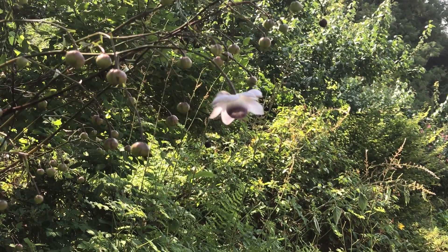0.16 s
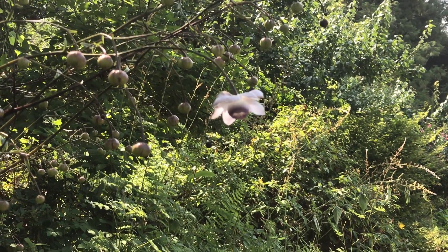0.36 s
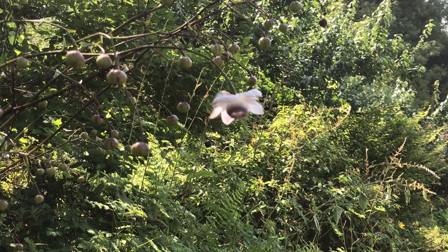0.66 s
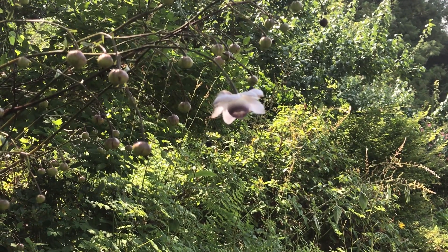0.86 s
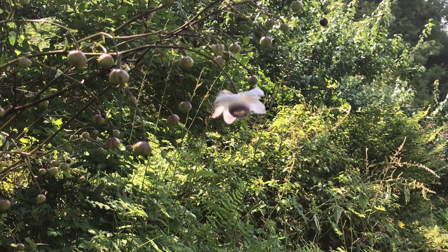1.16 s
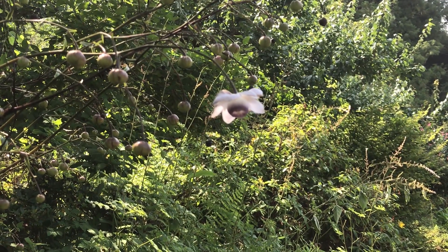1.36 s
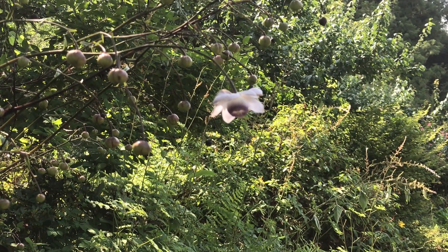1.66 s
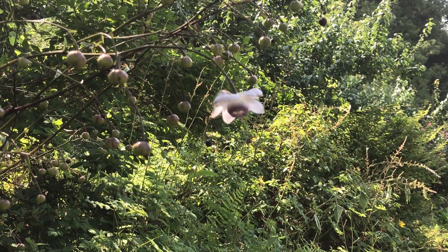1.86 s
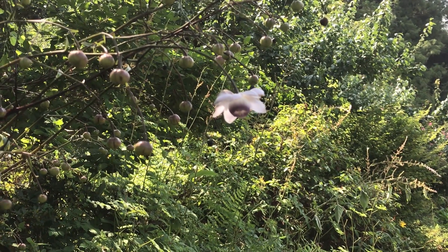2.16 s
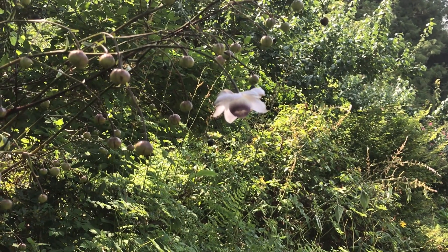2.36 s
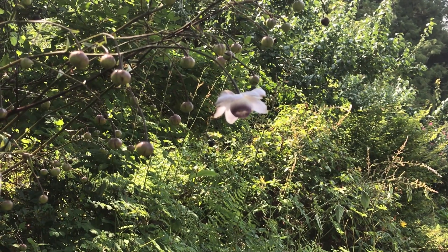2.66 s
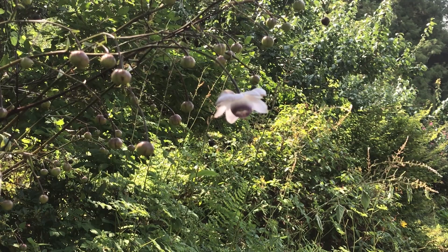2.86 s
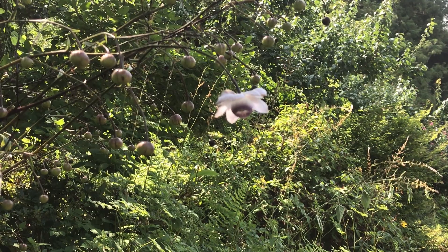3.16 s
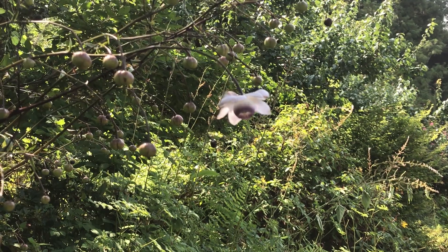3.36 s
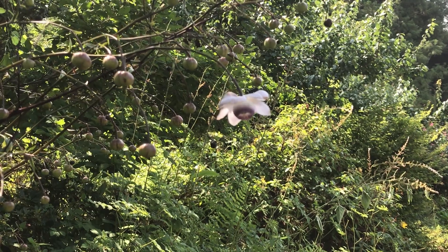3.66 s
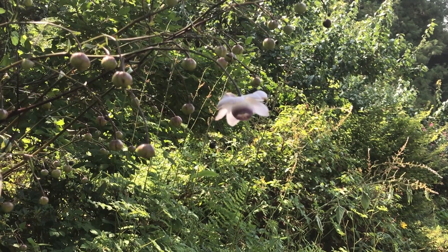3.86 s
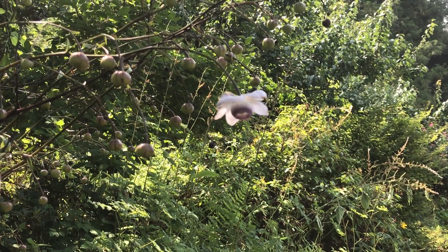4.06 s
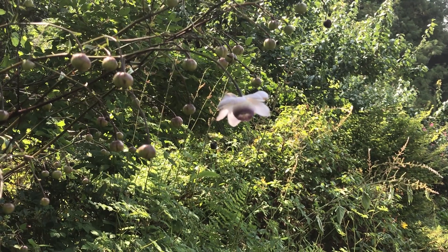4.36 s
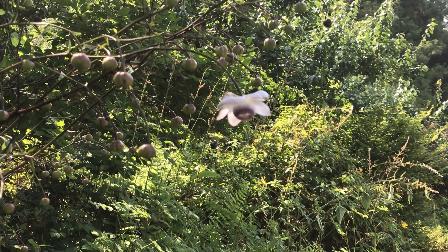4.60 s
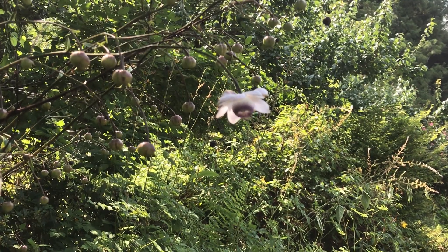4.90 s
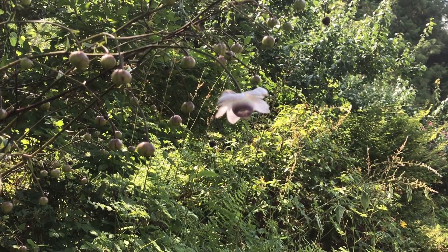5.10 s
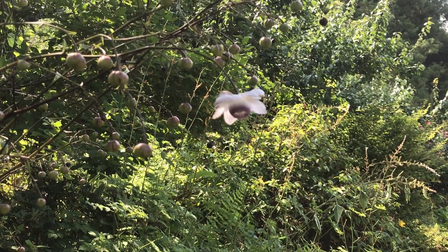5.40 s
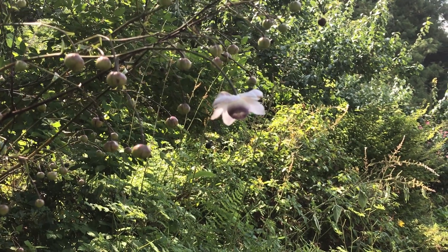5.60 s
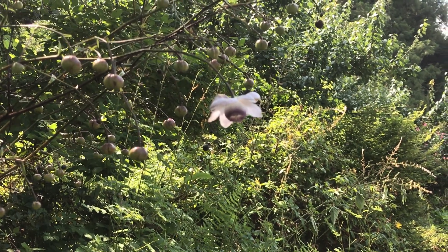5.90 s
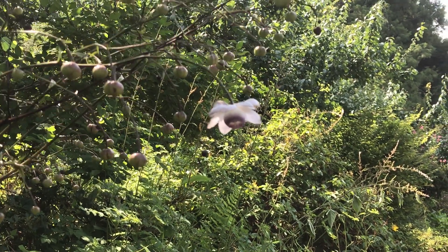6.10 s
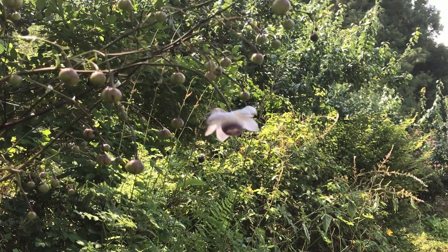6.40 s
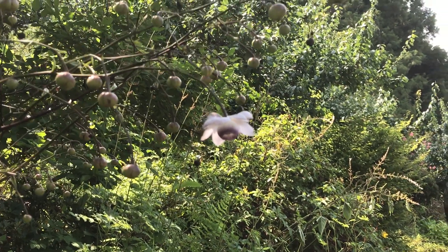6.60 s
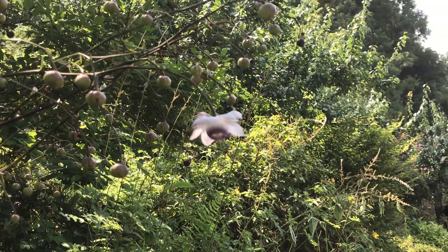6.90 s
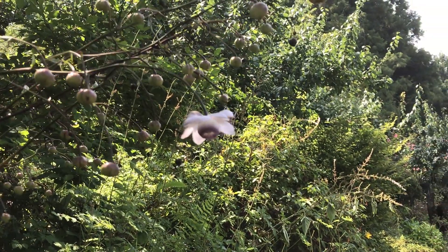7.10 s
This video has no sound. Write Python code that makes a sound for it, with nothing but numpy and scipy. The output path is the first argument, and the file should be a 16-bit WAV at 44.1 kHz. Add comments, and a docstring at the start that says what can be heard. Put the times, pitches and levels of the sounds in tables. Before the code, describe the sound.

In a leafy garden, a continuous high cicada chorus hisses throughout. Two insects rasp in short, uneven bursts above it, while another ticks rapidly and fades. A smooth insect whine swells early, then stops abruptly near five seconds as a brighter buzzing singer takes over. Beneath are faint bird chips, a repeated rising slide, low hoots and distant engine hum. Open outdoor microphone, insects dominant, birds far off with slight leafy echo.

```python
"""Cicada garden in the heat

A far chorus hisses steadily as the sum of many click trains and noise; nearer singers add gliding
rows of harmonics, a line spectrum or a narrow rough band. Two insects rasp as swells of resonant noise.
A bird repeats a rising slide with its octave; chips, far whistles and low hoots are gliding sines,
and an insect ticks as short swells of one tone. Traffic hums below in engine harmonics and a
resonant drone, over a bed of coloured noise for wind, leaves and a far town."""
import sys
import numpy as np
from scipy import signal
from scipy.fft import rfft, irfft, next_fast_len
from scipy.io import wavfile

SR = 44100
rng = np.random.default_rng(int(sys.argv[2]) if len(sys.argv) > 2 else 0)


def int16_out(signal):
    """Quantize to a 16-bit WAV file."""
    q = np.round(np.clip(np.atleast_2d(signal).T, -1, 1) * 32767)
    wavfile.write(sys.argv[1], SR, q.astype(np.int16))


def gain_from_decibels(decibels):
    """Convert decibel values to linear amplitude factors."""
    exponent = np.asarray(decibels, float) / 20
    return 10 ** exponent


N = 319725


def rms_one(x):
    """Normalisation: scale a signal to unit rms."""
    return x / np.sqrt(np.mean(x ** 2) + 1e-20)


def in_time(rows, s):
    """Linear interpolation: the columns of a table read at the times s."""
    at, *columns = np.transpose(rows)
    return [np.interp(s, at, c) for c in columns]


def ramp(t, start_s, length_s):
    """Linear onset: 0 before the start, 1 after the given length."""
    return np.clip((t - start_s) / length_s, 0, 1)


def coloured(x, points):
    """Spectral filtering: weight x by a (frequency [Hz], gain [dB]) curve, drawn over log frequency."""
    hz, db = np.transpose(points)
    size = next_fast_len(N + 4096)
    log_hz = np.log(np.arange(size // 2 + 1) * SR / size + 1)
    gain = gain_from_decibels(np.interp(log_hz, np.log(hz), db, -120, -120))
    return irfft(rfft(x, size) * gain, size)[:N]


def drift(rate):
    """Low-pass noise: a slow random curve of spread 1, with a double pole at rate [Hz]."""
    r = np.exp(-40 * np.pi * rate / SR)  # drawn at a twentieth of the sample rate
    white = rng.standard_normal(N // 20 + 4002)
    slow = signal.lfilter([1], [1, -2 * r, r * r], white)[4000:]
    return np.interp(np.arange(N) / 20, np.arange(len(slow)), rms_one(slow - slow.mean()))


def resonance(x, hz, width_hz):
    """Damped resonator: a two-pole band with a peak gain of about 1."""
    r = np.exp(-np.pi * width_hz / SR)
    poles = [1, -2 * r * np.cos(2 * np.pi * hz / SR), r * r]
    return signal.lfilter([(1 - r * r) / 2, 0, (r * r - 1) / 2], poles, x)


def sine(hz):
    """Phase integration: a sine of rms 1 that follows a pitch curve."""
    return np.sqrt(2) * np.sin(2 * np.pi * (np.cumsum(hz) / SR + rng.random()))


def note(length_s, start_hz, end_hz, edge):
    """Linear frequency glide: a sine with tapered ends, edge being the tapered share."""
    size = round(length_s * SR)
    return signal.windows.tukey(size, np.clip(edge, 0, 1)) * sine(np.linspace(start_hz, end_hz, size))


def clicks(hz, uneven):
    """Pulse train: one click per cycle of hz, uneven in size."""
    cycles = np.cumsum(hz) / SR + rng.random()
    marks = np.diff(np.floor(cycles), prepend=0) > 0
    return marks * (1 + uneven * rng.standard_normal(N))


def add(out, s, sound):
    """Superposition: mix a short sound in at time s."""
    at = max(round(s * SR), 0)
    out[at:at + len(sound)] += sound[:N - at]


def bumps(events, length_s):
    """Amplitude envelope: a smooth swell centred on each event."""
    out, shape = np.zeros(N), np.hanning(round(length_s * SR))
    for s, db in events:
        add(out, s - length_s / 2, gain_from_decibels(db) * shape)
    return out


def garden(x, wet_db, t60):
    """Diffuse scattering off leaves and trunks: echoes as a tail of noise that dies 60 dB in t60 [s]."""
    s = np.arange(round(t60 * SR)) / SR
    onset = np.minimum(s / 0.0093, 1)
    tail = rng.standard_normal(len(s)) * gain_from_decibels(-60 * s / t60) * onset
    return x + gain_from_decibels(wet_db) * signal.fftconvolve(x, tail / np.linalg.norm(tail))[:N]


# Course of the far chorus: (time [s], rms level [dB])
CHORUS_LEVEL = [(0.0, -38), (4.3, -39), (5.6, -39.5), (6.6, -38), (7.25, -38)]
# Spectral shape of the chorus: (frequency [Hz], relative level [dB])
CHORUS_SPECTRUM = [(2350, -47.5), (4000, -32.5), (4540, -26.5), (5450, -22.5), (5680, -16), (5860, -12),
                   (7280, -3.5), (7880, -1), (8780, 2), (9730, -7.5), (10700, -42.5), (13500, -31),
                   (15700, -37.5), (17000, -35)]


def chorus(t, count=14):
    """Incoherent summation: click trains at separate wavering rates, blurred by the leaves into hiss."""
    singers = np.zeros(N)
    for hz in rng.uniform(260, 520, count):
        train = clicks(hz * (1 + 0.004 * drift(3)), uneven=0.54)
        singers += rng.choice([-1, 1]) * gain_from_decibels(0.55 * drift(1.7)) * train
    blur = rng.standard_normal(N) * gain_from_decibels(0.42 * drift(12.0))
    hiss = coloured(0.47 * rms_one(singers) + blur, CHORUS_SPECTRUM)
    return gain_from_decibels(in_time(CHORUS_LEVEL, t)[0]) * rms_one(hiss)


# Two far engines changing speed, one list each:
# (time [s], mean firing rate [Hz], mean level of the fundamental [dB])
ENGINE_COURSES = [
    [(0, 56.65, -64.5), (.4, 56.85, -64), (.8, 41.67, -66), (1.1, 52.7, -72.5), (5.6, 51.93, -74),
     (6.1, 53.95, -62.5), (7.0, 67, -60.5), (7.25, 72, -66)],
    [(5.1, 65.6, -87), (5.3, 74.63, -68), (6.2, 115.8, -69), (6.4, 120, -102)],
]
# Course of the drone's main band: (time [s], mean level [dB])
DRONE_LEVEL = [(0.0, -64), (2.1, -81), (3.2, -69.5), (4.4, -73.5), (5.4, -67), (7.25, -79.5)]
DRONE_HZ = 109.6


def traffic(t):
    """Harmonic series and resonance: engine notes with two weak overtones, a narrow drone with its octave."""
    engines = np.zeros(N)
    for course in ENGINE_COURSES:
        hz, level_db = in_time(course, t)
        hz = hz + 1.446 * drift(3.7)
        harmonics = sine(hz) + gain_from_decibels(-12) * sine(2 * hz) + gain_from_decibels(-19) * sine(3 * hz)
        engines += gain_from_decibels(level_db + 1.4 * drift(10.0)) * harmonics
    hum = rng.standard_normal(N)
    drone = rms_one(resonance(resonance(hum, DRONE_HZ, 15), DRONE_HZ, 15))
    octave = rms_one(resonance(resonance(hum, 2 * DRONE_HZ, 22), 2 * DRONE_HZ, 22))
    drone_db = in_time(DRONE_LEVEL, t)[0] + 0.5 * drift(1.04)
    return engines + gain_from_decibels(drone_db) * (drone + gain_from_decibels(-11.5) * octave)


# Spectral shape of wind, leaves and far town: (frequency [Hz], relative level [dB])
AIR_SPECTRUM = [(19, -47), (32, -3.5), (59, -0.5), (111, -5), (174, -8), (513, -17.5), (643, -17.5),
                (788, -19), (1710, -21), (2370, -19.5), (3360, -24.5), (3790, -29), (4200, -39),
                (5460, -54), (9240, -120)]
AIR_DB = -66  # rms


def air():
    """Broadband noise: white noise shaped to the steady sound of wind, leaves and a far town."""
    return gain_from_decibels(AIR_DB) * rms_one(coloured(rng.standard_normal(N), AIR_SPECTRUM))


# Swells of the two rasping insects: (centre time [s], level of the main band at the peak [dB])
LOW_RASP_SWELLS = [(0.016, -43), (0.51, -46), (1.005, -44.5), (1.458, -52), (1.826, -55), (2.182, -52),
                   (2.86, -46.5), (3.186, -45), (3.846, -40.5), (4.423, -42.5), (4.687, -42.5),
                   (5.01, -42.5), (5.294, -43.5), (5.663, -41.5), (5.947, -44), (6.224, -42.5),
                   (6.553, -42), (6.834, -41.5), (7.065, -41.5)]
HIGH_RASP_SWELLS = [(0.488, -41), (0.873, -45), (0.983, -42.5), (1.307, -45), (1.512, -38), (1.738, -44),
                    (2.574, -38), (3.402, -36.5), (3.862, -40.5), (4.203, -44), (4.556, -36),
                    (4.896, -42.5), (5.067, -39), (5.25, -43.5), (5.611, -35), (6.051, -43.5), (6.217, -45),
                    (6.323, -36), (6.866, -37), (7.244, -41.5)]


def rasp(events, hz, width_hz, length_s):
    """Resonant excitation: grainy scraping in one band, in short swells, with a faint broad treble edge."""
    grains = rng.standard_normal(N) * gain_from_decibels(0.53 * drift(240))
    body = rms_one(resonance(resonance(grains, hz, width_hz), hz, width_hz))
    edge = rms_one(resonance(grains, 1.22 * hz, 1400))
    return bumps(events, length_s) * (body + gain_from_decibels(-13) * edge)


# Pitch and level start here at time zero, then sink; the gap is the first one.
TICK_FIRST_S, TICK_GAP_S, TICK_SLOWING_S = 0.039, 0.058, 0.0006  # slowing: growth per gap
TICK_DB, TICK_FADE_DB_PER_S = -62.5, 2.2
TICK_HZ, TICK_SAG_HZ_PER_S, TICK_LENGTH_S = 4586, 90.0, 0.029


def ticks(t, count=34):
    """Amplitude gating: swells of one sinking, rough tone; the gaps lengthen and the level fades."""
    k, chance = np.arange(count), rng.standard_normal((count, 2))
    s = TICK_FIRST_S + TICK_GAP_S * k + TICK_SLOWING_S * k * k / 2 + 0.003 * chance[:, 0]
    db = TICK_DB - TICK_FADE_DB_PER_S * s + 1.1 * chance[:, 1]
    tone = sine(TICK_HZ - TICK_SAG_HZ_PER_S * t + 170 * drift(196))
    return bumps(zip(s, db), TICK_LENGTH_S) * (1 + 0.46 * drift(400)) * tone


# Series of evenly spaced chips: (first time [s], last time [s], mean direct level [dB])
CHIP_ROWS = [(0.183, .532, -72.5), (1.557, 2.236, -73.5), (2.85, 3.444, -72.5), (4.196, 4.787, -72.5),
             (5.369, 5.957, -71.5), (6.612, 7.198, -72)]
CHIP_GAP_S = 0.085  # approximate: each series holds a whole number of gaps


def chips():
    """Upward frequency glide: quick chips that flutter on their way through the leaves."""
    out = np.zeros(N)
    for first, last, db in CHIP_ROWS:
        for s in np.linspace(first, last, round((last - first) / CHIP_GAP_S) + 1):
            chip = note(0.0233, 1801, 2990, edge=0.2)
            add(out, s - 0.012, gain_from_decibels(db + 1.2 * rng.standard_normal()) * chip)
    return out * (1 + 0.48 * drift(400))


# Partials of the low singer:
# (multiple of the beat, early level [dB], settled level [dB]), both before LOW_GAIN_DB
LOW_SINGER_PARTIALS = [(42, -88, -73), (47, -82, -69), (48, -76, -61), (48.3, -85, -64), (49, -80, -68),
                       (50, -78, -73), (53, -61, -60), (54, -60, -60), (55, -57, -65), (56, -68, -70),
                       (57, -72, -72)]
LOW_GAIN_DB = 2.0
LOW_START_S, LOW_SWELL_S, LOW_STOP_S, LOW_RELEASE_S = 0.64, 1, 4.92, 0.038
LOW_SETTLE_S = (1.8, 3.0)  # the weight moves between these times
# The mean beat climbs ever more slowly to its full rate; the climb is that of the last second.
LOW_FULL_HZ, LOW_FULL_S, LOW_CLIMB_HZ, LOW_CLIMB_BEND = 113.0, 2.75, 4.0, 1.35


def low_singer(t):
    """Common fundamental: multiples of the drum beat slide up together, then the weight moves lower."""
    climb_left = LOW_CLIMB_HZ * np.maximum(LOW_FULL_S - t, 0) ** LOW_CLIMB_BEND
    beat_hz = (LOW_FULL_HZ - climb_left) * (1 + 0.0004 * drift(5))
    settled = ramp(t, LOW_SETTLE_S[0], LOW_SETTLE_S[1] - LOW_SETTLE_S[0])
    partials = np.zeros(N)
    for multiple, early_db, late_db in LOW_SINGER_PARTIALS:
        level_db = early_db + settled * (late_db - early_db) + 1.5 * drift(23)
        partials += gain_from_decibels(level_db) * sine(multiple * beat_hz + 11.06 * drift(27.8))
    swell = ramp(t, LOW_START_S, LOW_SWELL_S)
    cut_off = 1 - ramp(t, LOW_STOP_S, LOW_RELEASE_S)
    return gain_from_decibels(LOW_GAIN_DB) * swell * cut_off * partials


# Far whistles: (time [s], length [s], start pitch [Hz], end pitch [Hz], direct level before flutter [dB])
WHISTLE_NOTES = [(.95, 0.044, 3230, 3280, -72), (1.3, 0.1, 3900, 3900, -71),
                 (1.533, 0.059, 3090, 3030, -77), (1.688, 0.051, 2430, 2260, -73),
                 (1.89, .06, 2880, 2830, -76), (2.037, 0.048, 2700, 2370, -74),
                 (2.577, 0.075, 1540, 1238, -73), (2.591, 0.027, 3450, 3540, -70),
                 (2.598, 0.046, 4250, 4070, -67), (2.625, 0.068, 3850, 3870, -71.5),
                 (2.639, 0.026, 3430, 3270, -73), (3.06, 0.077, 3000, 2840, -74),
                 (3.42, 0.043, 3600, 3450, -74), (3.87, 0.12, 3880, 3880, -74),
                 (4.038, 0.052, 3350, 3600, -72.5), (5.11, 0.11, 3850, 3920, -74.5),
                 (5.59, 0.071, 4250, 4270, -72), (5.655, 0.068, 4270, 4200, -70),
                 (5.64, 0.17, 920, 890, -80), (5.712, 0.047, 4200, 4350, -71),
                 (6.3, 0.071, 3890, 3870, -73.5)]


def whistles():
    """Random modulation: gliding far whistles flutter on their way through the leaves."""
    out = np.zeros(N)
    for s, length_s, start_hz, end_hz, db in WHISTLE_NOTES:
        add(out, s, gain_from_decibels(db) * note(length_s, start_hz, end_hz, edge=0.3))
    return out * (gain_from_decibels(2.5 * drift(40)) + 0.55 * drift(200))


# Shape of one rising slide, before the gain and pitch share of each call:
# (time from the steep part [s], pitch [Hz], level [dB], octave level [dB])
SLIDE_SHAPE = [(-.19, 1469, -22, -31), (-.12, 1627, -23, -16), (-.08, 1800, -14, -13),
               (-.045, 1980, -8, -11.5), (-.02, 2284, -10.5, -19), (0, 2800, -9, -50),
               (0.01, 3280, -7.5, -55), (0.02, 3830, -46, -55)]
# Calls: (time of the steep part [s], gain on the shape [dB], pitch share [ratio])
SLIDE_CALLS = [(1.21, -55.5, 0.99), (2.508, -54.5, 0.96), (3.794, -56.5, .99), (5.038, -55.5, 1.0),
               (6.219, -56.5, 0.96)]


def slides():
    """Frequency modulation: one rising tune sung five times, breathy, with an octave that breaks up."""
    out, s = np.zeros(N), np.arange(SLIDE_SHAPE[0][0], SLIDE_SHAPE[-1][0], 1 / SR)
    hz, level_db, octave_db = in_time(SLIDE_SHAPE, s)
    wobble, flutter, breath, broken = drift(16.2), drift(71), drift(250), drift(90)
    for at, db, share in SLIDE_CALLS:
        now = round(at * SR) + np.arange(len(s))
        pitch = share * hz * (1 + 0.0118 * wobble[now] + 0.015 * flutter[now])
        voice = (gain_from_decibels(2.2 * flutter[now]) + 0.6 * breath[now]) * sine(pitch)
        octave = broken[now] * sine(2 * pitch + 120 * breath[now])
        add(out, at + s[0], gain_from_decibels(db) * (gain_from_decibels(level_db) * voice + gain_from_decibels(octave_db) * octave))
    return out


# Low hoots, strongest in the middle: (time [s], length [s], mean direct level [dB])
HOOT_NOTES = [(1.71, .1, -78), (1.843, 0.12, -73), (1.998, 0.093, -73.5), (2.153, 0.084, -76),
              (2.282, .08, -76.5), (2.446, 0.037, -80)]
HOOT_HZ, HOOT_SAG_HZ = 1004, 21  # starting pitch, fall over each hoot


def hoots():
    """Near-pure tones: a row of low hoots, each sagging slightly, with only a mild drift in level."""
    out = np.zeros(N)
    for s, length_s, db in HOOT_NOTES:
        add(out, s, gain_from_decibels(db) * note(length_s, HOOT_HZ, HOOT_HZ - HOOT_SAG_HZ, edge=0.24))
    return out * gain_from_decibels(1.2 * drift(40))


# A faint rising singer: (time [s], mean pitch [Hz], mean level [dB])
THIN_COURSE = [(3.1, 6280, -80), (3.6, 6350, -65), (4.9, 6620, -59), (5.0, 6620, -80)]


def thin_singer(t):
    """Random frequency modulation: a jittered sine becomes a narrow, rough band creeping upward."""
    hz, level_db = in_time(THIN_COURSE, t)
    return gain_from_decibels(level_db + 4.0 * drift(60)) * sine(hz + 50 * drift(80))


# Click rate of the high singer: (time [s], mean rate [Hz])
HIGH_RATE = [(5.0, 443), (5.5, 440.3), (6.5, 439.9), (6.9, 441.5)]
# Response of the singer's body: (frequency [Hz], relative gain [dB])
HIGH_RESPONSE = [(6500, -52), (8000, -1), (9000, -3.5), (9700, -2.5), (10200, -9), (10700, -16),
                 (11500, -23), (12300, -26), (13600, -23), (15400, -36), (17000, -38)]
HIGH_START_S, HIGH_SWELL_S, HIGH_DB = 4.95, 0.2, -42.5
HIGH_TIRES_S, HIGH_FADE_DB_PER_S = 6.25, 12


def high_singer(t):
    """Line spectrum: a regular click train through the body gives even lines; echoes smooth the clicks."""
    train = clicks(in_time(HIGH_RATE, t)[0] * (1 + 0.0014 * drift(5)), uneven=0.75)
    song = garden(coloured(train, HIGH_RESPONSE), wet_db=5.5, t60=0.092)
    fade_db = HIGH_FADE_DB_PER_S * np.maximum(t - HIGH_TIRES_S, 0)
    level_db = HIGH_DB - fade_db + 0.39 * drift(20)
    return gain_from_decibels(level_db) * ramp(t, HIGH_START_S, HIGH_SWELL_S) * rms_one(song)


def scene():
    """Linear superposition: all voices of the garden at one microphone."""
    t = np.arange(N) / SR
    insects = chorus(t) + low_singer(t) + thin_singer(t) + high_singer(t)
    low_rasp = rasp(LOW_RASP_SWELLS, hz=6356, width_hz=810, length_s=0.046)
    high_rasp = rasp(HIGH_RASP_SWELLS, hz=7106, width_hz=750, length_s=0.079)
    far_slides = garden(slides(), wet_db=-2.5, t60=0.47)
    small_voices = chips() + whistles() + hoots() + ticks(t)
    far = far_slides + garden(small_voices, wet_db=-6.5, t60=0.46)
    return (insects + low_rasp + high_rasp + far + traffic(t) + air())[None]


def top_cut(x):
    """Nothing passes above the cut-off."""
    return signal.sosfilt(signal.butter(12, 17130, fs=SR, output="sos"), x)


def record(dry):
    """Direct transmission: the microphone mix is passed on with no added gain, only cut off above the
    recorder's treble limit."""
    return top_cut(dry)


dry = scene()
out = record(dry)
int16_out(out)
```